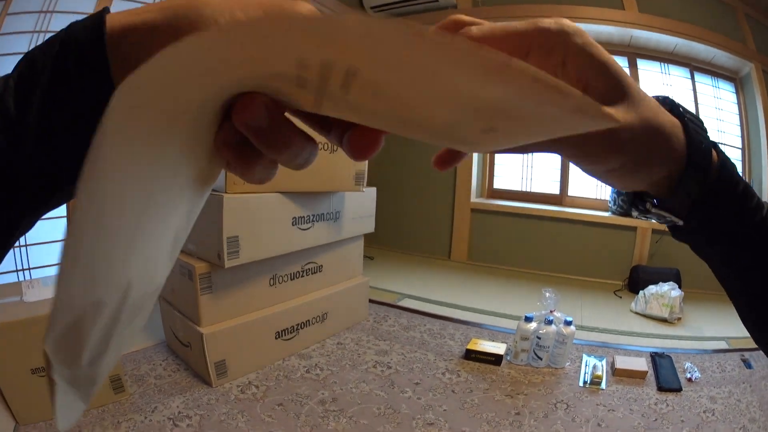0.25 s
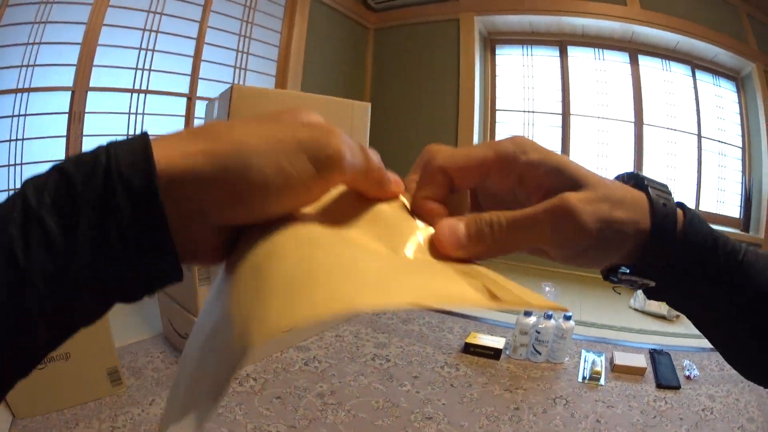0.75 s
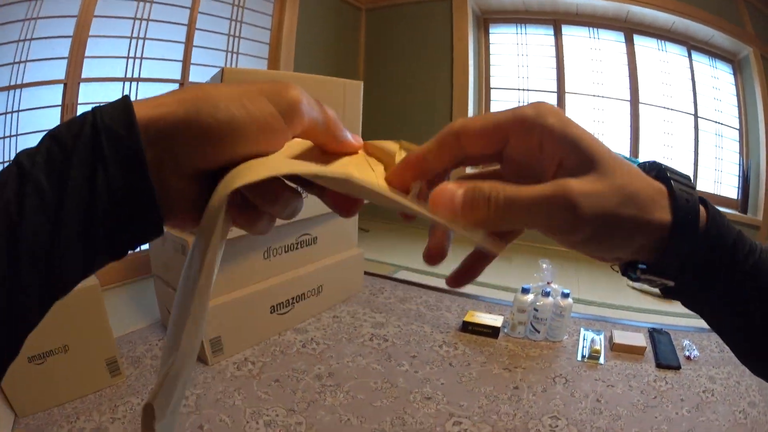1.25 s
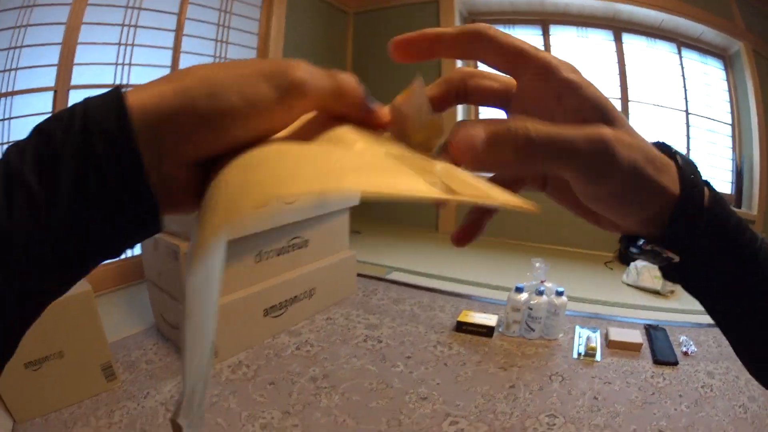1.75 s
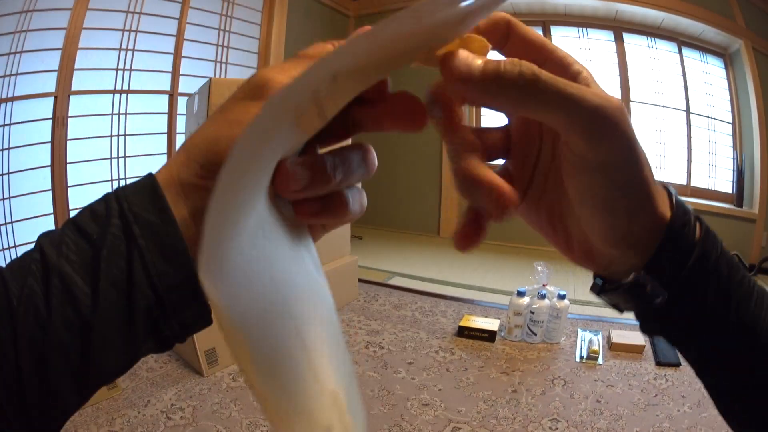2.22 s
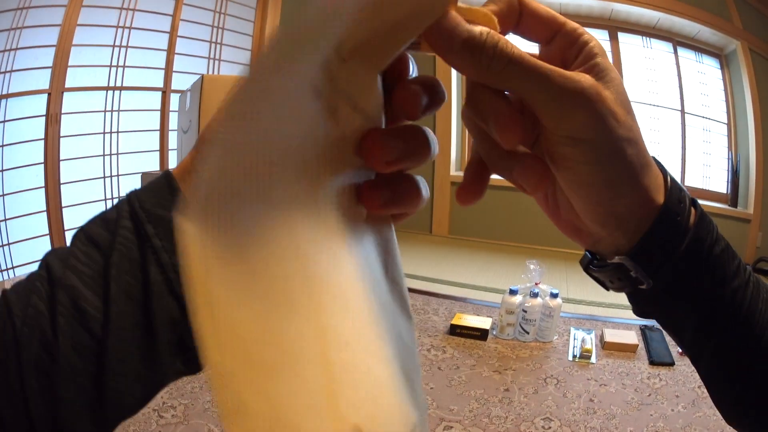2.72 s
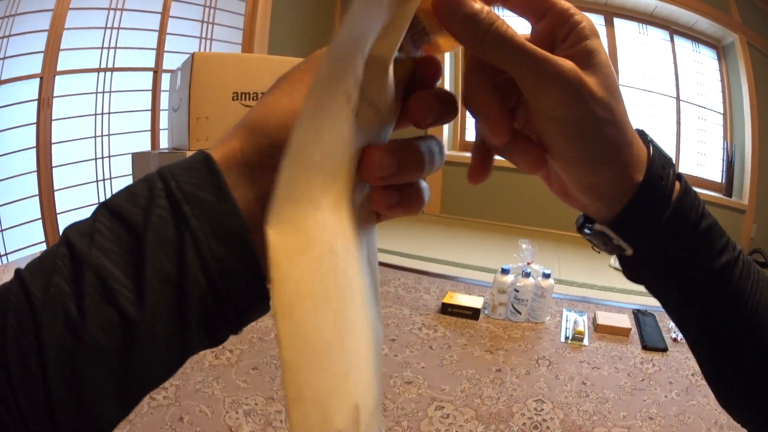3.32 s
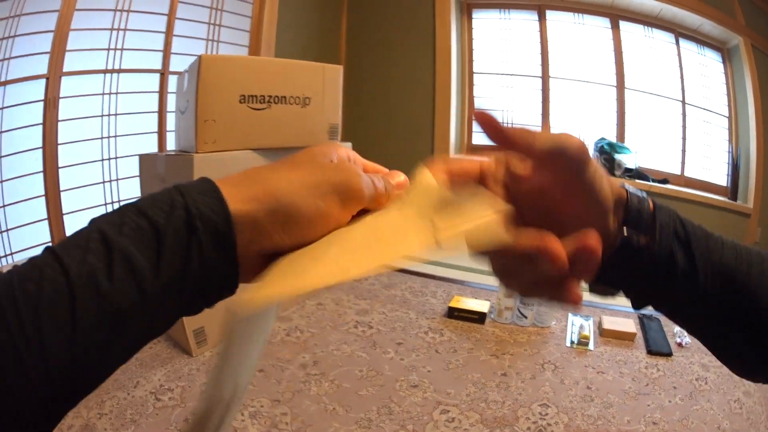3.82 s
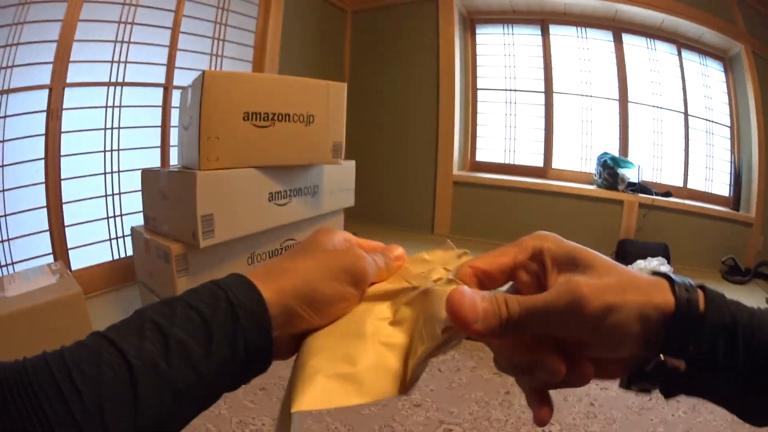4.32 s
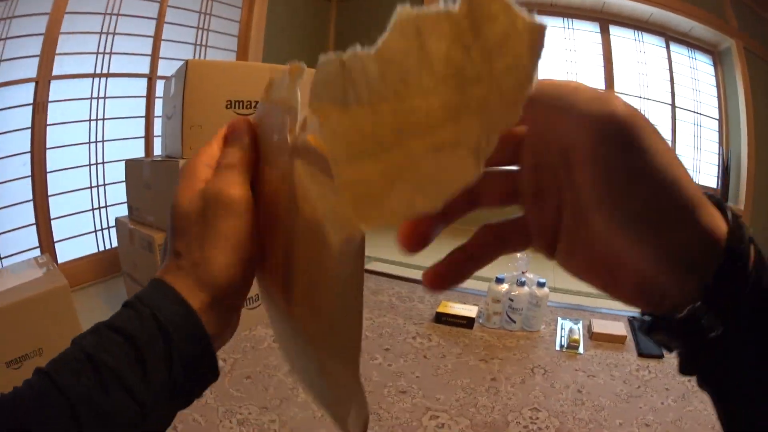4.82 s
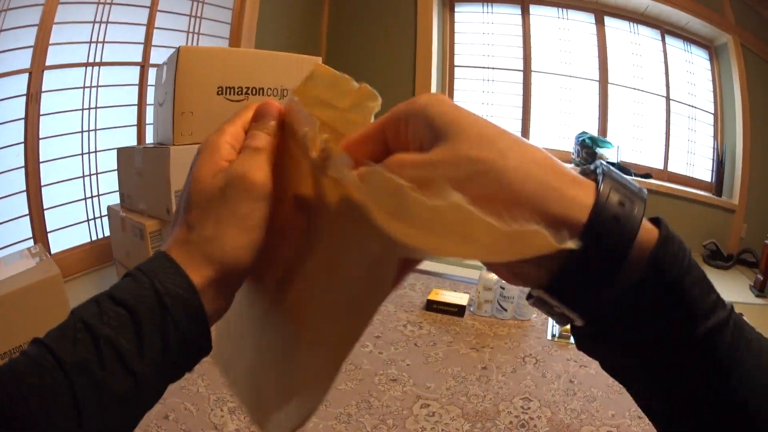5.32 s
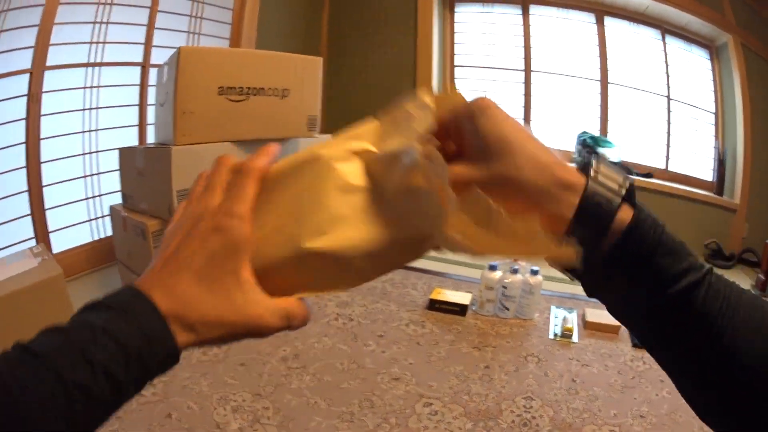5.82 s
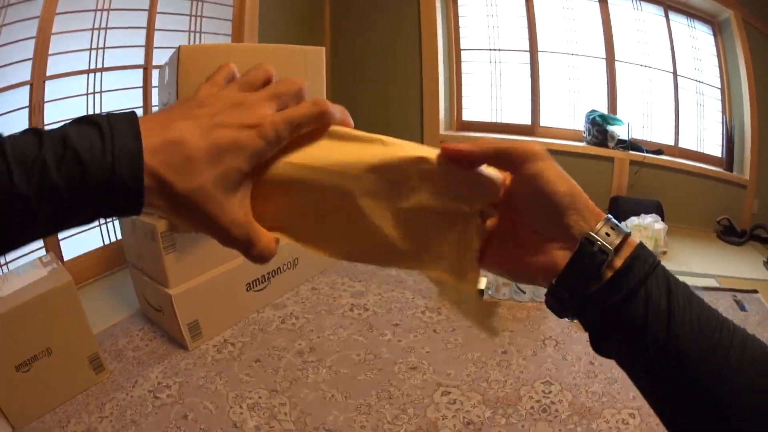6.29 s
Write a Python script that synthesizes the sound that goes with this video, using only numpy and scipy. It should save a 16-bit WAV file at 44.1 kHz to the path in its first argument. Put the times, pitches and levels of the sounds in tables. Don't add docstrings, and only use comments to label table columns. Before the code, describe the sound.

Stiff paper crackles in quick bright snaps, quiets to faint rustling, then rips sharply and crumples loudly as the bag is spread and handled close by.

```python
import sys
import numpy as np
from scipy import signal
from scipy.fft import rfft, irfft, next_fast_len
from scipy.io import wavfile
from scipy.ndimage import uniform_filter1d

SR = 44100
rng = np.random.default_rng(int(sys.argv[2]) if len(sys.argv) > 2 else 0)


def undo_db(level):
    steps = np.asarray(level, float) / 20
    return 10 ** steps


def persist_wave(psi):
    counts = np.round(np.clip(psi, -1, 1) * 32767).astype(np.int16)
    wavfile.write(sys.argv[1], SR, np.atleast_2d(counts).T)


N = 288855

# (frequency [Hz], density [dB per Hz])
AIR_SPECTRUM = [(24, -42), (40, -34), (429, -6.5), (720, 3), (1720, -17), (7210, -55), (11000, -22),
                (12000, -55), (22000, -120)]
AIR_DB = -63
# (frequency [Hz], T60 [s])
ROOM_DECAY = [(200, 0.27), (1500, 0.61), (5000, 0.32), (10000, 0.17)]
# (frequency [Hz], difference [dB])
PORT_LEVEL = [(60, -1), (220, -4), (840, -2), (3130, 2), (10500, 0.5), (12000, -1)]
# (frequency [Hz], left lead [rad])
PORT_PHASE = [(0, -0.72), (1030, 0.6), (5940, 0.27), (11900, -0.77)]
EDGE_HZ = 11040

# (frequency [Hz], density [dB per Hz])
PAPER_SPECTRUM = [(24, -52), (40, -38.5), (149, -28.5), (302, -8), (556, -2.5), (737, -7.5), (1490, 0.5),
                  (1840, -6), (2950, -4), (7040, 0), (9550, -21), (11000, -14.5), (14300, -77),
                  (22000, -120)]
# (frequency [Hz], width [Hz], level [dB])
BAG_MODES = [(1620, 1050, -7), (3000, 330, -10)]
# (time [s], share [0-1])
BAG_OPENING = [
    (0, 0.033),
    (3.4, 0.46),
    (4.4, 0.18),
    (5.6, 0.32),
    (6.55, .9),
]

# (time [s], peak level [dB])
FLOPS = [(0.191, -44), (0.67, -46), (1.511, -47), (1.988, -59), (4.344, -44), (4.912, -42), (5.152, -44),
         (5.274, -42), (5.314, -42), (5.421, -39), (5.56, -45), (5.925, -43), (5.939, -41), (4.59, -48),
         (1.75, -50)]
# (time [s], peak level [dB], panel pitch [Hz])
PANEL_POPS = [(0.177, -34, 398), (0.186, -34, 264), (0.364, -36, 552), (0.495, -34, 519), (0.744, -40, 549),
              (1.467, -28, 549), (1.654, -28, 560), (1.819, -32, 509), (1.999, -19, 280), (2.016, -20, 589),
              (2.079, -36, 514), (2.148, -37, 334), (2.726, -35, 310), (2.816, -35, 380), (2.887, -38, 334),
              (3.218, -42, 517), (3.868, -31, 509), (3.938, -26, 598), (4.121, -24, 514), (4.374, -27, 517),
              (4.439, -22, 439), (4.479, -30, 320), (4.911, -31, 318), (5.066, -34, 369), (5.152, -35, 226),
              (5.179, -40, 361), (5.254, -33, 423), (5.276, -33, 336), (5.299, -38, 242), (5.315, -31, 205),
              (5.519, -35, 522), (5.557, -30, 458), (5.586, -27, 436), (5.604, -35, 439), (5.624, -38, 291),
              (5.682, -35, 474), (5.799, -28, 423), (5.931, -26, 291), (5.98, -25, 320), (6.009, -33, 320),
              (6.065, -29, 493), (6.194, -24, 460), (6.307, -28, 331), (6.347, -22, 363), (6.435, -22, 363),
              (6.471, -24, 433), (6.512, -24, 568)]
POP_RISE_S, POP_T60_S, POP_DB = .0015, .035, -1

# (time [s], peak level [dB], ring pitch [Hz])
EXTRA_CREASES = [(0.0462, -8, 4610), (0.0589, -12, 4390), (0.0705, -16, 4070), (0.1556, -34, 5040),
                 (0.4982, -20, 5710), (0.5612, -29, 4010), (0.6393, -36, 1180), (0.7152, -26, 6800),
                 (0.8829, -22, 7470), (1.1499, -25, 1610), (1.1677, -31, 4310), (1.3796, -21, 1790),
                 (1.4367, -10, 1400), (1.6182, -22, 4180), (1.7666, -28, 1120), (1.9558, -23, 7130),
                 (2.0172, -9, 7710), (2.0191, -11, 6440), (2.1268, -29, 5340), (2.2559, -31, 3400),
                 (2.2982, -26, 4220), (2.353, -31, 5770), (2.5846, -31, 1400), (2.6719, -35, 950),
                 (2.6969, -29, 2670), (2.7909, -33, 2260), (2.8279, -27, 2710), (2.8577, -27, 2330),
                 (2.9718, -33, 4740), (3.2047, -28, 4840), (3.2386, -27, 2730), (3.2697, -31, 4820),
                 (3.3103, -30, 2710), (3.3519, -31, 3270), (3.4905, -20, 3100), (3.6855, -25, 3040),
                 (3.8289, -15, 4240), (3.9783, -21, 4500), (4.1093, -12, 4480), (4.1392, -6, 2970),
                 (4.1965, -19, 4330), (4.2182, -22, 6830), (4.2933, -17, 4440), (4.3235, -24, 1490),
                 (4.3408, -12, 4590), (4.3609, -6, 3040), (4.9121, -25, 3140), (5.0202, -24, 1940),
                 (5.2759, -26, 3340), (5.3777, -18, 1400), (5.4178, -19, 3490), (5.6868, -23, 3530),
                 (5.7803, -9, 3450), (5.8025, -7, 1270), (6.0079, -16, 7130), (6.0902, -26, 1440),
                 (6.1259, -31, 1510), (6.3313, -8, 1490), (6.5122, -12, 1490), (6.5312, -15, 3320)]
# (time [s], peak level [dB],
# ring pitch [Hz])
DRY_CREASES = [(0.2174, -21, 6600), (0.2455, -9, 7150), (0.2997, -2, 5050), (0.3652, -13, 2740),
               (0.5947, -21.5, 2500), (0.7457, -13, 3000), (0.768, -15, 6900), (0.8335, -21, 4700),
               (0.8934, -6, 4150), (0.908, -2.5, 3960), (0.9944, -17, 4600), (1.0895, -14, 4320),
               (1.3175, -11.5, 4900), (1.3255, -18, 6400), (1.4377, -6, 1480), (1.4533, -4, 4000),
               (1.5022, -10, 7300), (1.6435, -9, 7700), (1.6508, -2.5, 3830), (1.7104, -8, 1500),
               (1.851, -21, 2150), (1.865, -23, 4260), (1.9383, -3.5, 5140), (1.9989, -9, 7350),
               (2.0063, -8, 2420), (2.0914, -13.5, 2610), (2.178, -19, 3100), (2.2091, -12, 2950),
               (2.384, -15, 2680), (2.4592, -31, 4180),
               (2.9278, -20.5, 3080), (3.0708, -21, 1140), (3.083, -19, 1660), (3.1792, -27.5, 2560),
                   (3.2852, -24.5, 1870), (3.365, -18.5, 2880), (3.5961, -17, 4970), (3.646, -27, 1770),
                   (3.8145, -7, 1690), (3.868, -13, 1500), (3.8778, -3, 3670), (3.8882, -1.5, 1490),
                   (3.9405, -4, 2300), (4.025, -12, 7050), (4.049, -3.5, 1770), (4.137, -11, 5000),
                   (4.145, -4, 2700), (4.1903, -16, 1720), (4.2687, -6, 7060), (4.2768, -8, 4600),
                   (4.2807, -8, 7000), (4.3302, -8.5, 4650), (4.3476, -1, 5000), (4.38, -2, 4050),
                   (4.392, 2, 7650), (4.4085, -3, 3950), (4.4286, -3.5, 1620), (4.455, -14, 1530),
                   (4.772, -7.5, 4350), (4.813, -19, 2300),
               (4.9755, -22, 4650), (5.0443, -10, 2020), (5.07, -10, 2560), (5.1548, -14, 3160),
                   (5.236, -19.5, 2620), (5.432, -3, 2450), (5.44, -13, 3570), (5.4476, -18, 2300),
                   (5.5196, -12, 4100), (5.589, -9, 2070), (5.6166, -9, 1650), (5.723, -9, 1710),
                   (5.735, -8.5, 3860), (5.7673, -5, 2400), (5.772, -4, 1380), (5.7941, -5.5, 3280),
                   (5.8205, -9, 4350), (6.0154, -8, 3570), (6.0678, -12.5, 2450), (6.1886, -15, 1470),
                   (6.1948, -12.5, 3000), (6.244, -1.5, 5170), (6.3008, -8, 1800), (6.3104, -3.5, 2340),
                   (6.3165, -1, 3140), (6.3474, -7, 1540), (6.372, -9, 1330), (6.4275, -6, 1280),
                   (6.4555, -2.5, 2800), (6.5174, -3.5, 4670),
               (2.6138, -21.5, 1600), (2.5716, -30, 2400), (0.3369, -18, 5080), (1.632, -13, 7680),
                (0.391, -21, 7000), (1.8206, -19.5, 5000), (2.1695, -18, 2900), (2.897, -23, 2600),
                (3.6583, -24, 2000), (4.44, -5, 1450), (5.3104, -17.5, 1900), (6.3245, -3, 3100)]
# (time [s], peak level [dB], ring pitch [Hz], thump relative level [dB])
PANEL_BUCKLES = [(0.1719, -7.5, 4370, -22), (0.6667, -10, 3320, -16), (1.0673, -3, 3040, -18),
                 (1.1047, -20.5, 2930, -17), (1.5148, -20, 1510, -11), (1.6111, -22, 3020, -16),
                 (1.7924, -41, 1200, -10), (1.9761, -11.5, 2190, -9.5), (2.0024, -6, 2420, -14),
                 (2.738, -26, 2560, -9), (2.9442, -19.5, 7000, -12.5), (3.321, -28, 1331, -10),
                 (3.4988, -12, 1070, -19.5), (3.5537, -14.5, 1100, -12), (3.7977, -23, 4440, -14),
                 (3.9885, -15, 1580, -4), (4.122, -5, 4480, -21), (4.3519, -7, 1400, -7.5),
                 (4.4136, -2, 3830, -11.5), (4.7048, -21, 1720, -20), (4.9369, -17.5, 2700, -7.5),
                 (5.008, -10, 2000, -17), (5.3667, -10.5, 5530, -10), (5.3845, -12.5, 1320, -8),
                 (5.424, -4.5, 1570, -14), (5.5052, -12, 2400, -12.5), (5.7437, -9.5, 1780, -12),
                 (5.9938, -11.5, 1540, -12), (6.219, -17.5, 1490, -6), (6.4834, -8, 1660, -19)]
# (start [s], length [s], peak level [dB], ring pitch [Hz])
FOLD_RUNS = [
    (0.003, 0.08, -7.5, 4400),
    (1.616, 0.025, -23, 1520),
    (4.341, 0.055, -7.5, 4030),
    (5.336, 0.05, -21.5, 1330),
    (5.572, 0.006, -9, 1310),
    (5.785, 0.03, -20, 1990),
    (6.331, 0.04, -9, 1470),
    (6.434, 0.014, -6.5, 2030),
    (6.507, 0.03, -20, 2140),
]
RUN_GAP_S, RUN_FADE_DB_PER_S = .011, 70
RUN_SPREAD_DB, RUN_SPREAD_LOG_PITCH = 1.5, 0.098
SNAP_LEAD_S, EXTRA_LATE_S = .002, -.0004
DRY_THUMP_DB, DRY_SPREAD_DB = -31, 3.5

# (time [s], level [dB])
HAND_GRIP = [(0, -49), (0.55, -49.5), (0.82, -49), (1.12, -44), (1.3, -46.5), (1.75, -46), (1.9, -56),
             (1.96, -44), (2.27, -49), (2.47, -58), (3.0, -62), (3.4, -54.5), (4.06, -40.5), (4.3, -40),
             (4.85, -60), (5.2, -46), (6.1, -45.5), (6.55, -53)]
GRIP_FIZZ_DB, GRIP_FLEX_DB, GRIP_FLEX_SHARE = -3, -51.5, 0.2
# (start [s], length [s], effort [dB], fizz relative level [dB])
SEAM_PULLS = [(0.873, 0.047, -32, 5), (0.917, 0.067, -38, -7), (0.986, 0.034, -36, 11),
              (1.02, 0.09, -38.5, -2.5), (1.167, 0.11, -51, 12), (1.38, 0.036, -41, -1),
              (1.424, 0.018, -25, 2.5), (1.455, 0.066, -31, 2.3), (1.61, 0.025, -41, 1),
              (1.998, 0.024, -27, 3.5), (2.098, 0.2, -44.5, -12), (2.572, 0.045, -42.5, -3.5),
              (3.063, 0.073, -45, -4), (3.308, 0.026, -37, -3.5), (3.415, 0.073, -49.5, 0.5),
              (3.483, 0.081, -32, -3.5), (3.561, 0.23, -41.5, -4), (3.814, 0.137, -32, 4),
              (3.951, 0.098, -36, -3), (4.107, 0.045, -27, 3), (4.152, 0.07, -37, 1.5),
              (4.217, 0.052, -51, -1), (4.263, 0.035, -33, 2), (4.328, 0.019, -37, 10),
              (4.345, 0.105, -27.5, -0.5), (4.347, 0.01, -27, -2), (4.372, 0.024, -30, 5),
              (4.406, 0.011, -27, 1), (4.437, 0.013, -26, -1), (3.936, 0.01, -27, -1),
              (4.117, 0.014, -31, 3), (1.428, 0.012, -33, -8), (4.455, 0.04, -26, 0), (4.5, 0.05, -35, -1),
              (4.55, 0.05, -43, -7), (5.364, 0.095, -32.5, -4.5), (5.504, 0.1, -39, -3),
              (5.624, 0.1, -50.5, -12), (5.735, 0.09, -24, -8.5), (5.826, 0.11, -36.5, -4.5),
              (6.31, 0.074, -25.5, -8.5)]
# (start [s], length [s], effort [dB], fizz relative level [dB])
SHEET_BENDS = [(0.0, 0.067, -45.5, 17.5), (0.172, 0.017, -50, 13), (0.186, 0.093, -49, 6),
               (0.343, 0.038, -48, 13), (0.487, 0.055, -46, 9.5), (0.662, 0.12, -47, 9.5),
               (1.641, 0.033, -34, -16), (1.785, 0.053, -36, -1.5), (1.998, 0.006, -40, 3.5),
               (2.026, 0.077, -42, -2), (2.291, 0.12, -48.5, 0.5), (2.691, 0.129, -47, -2.5),
               (2.815, 0.025, -46.5, 3), (2.854, 0.045, -44, 2.5), (2.51, 0.046, -58.5, 4),
               (5.67, 0.035, -43, 2), (2.897, 0.061, -45.5, -15), (3.201, 0.13, -46.5, 2),
               (3.72, 0.09, -58, 8), (4.488, 0.041, -38, -2), (4.911, 0.228, -44, 1.5),
               (5.148, 0.04, -41, 5.5), (5.272, 0.1, -41.5, 4.1), (5.923, 0.1, -33.5, 1.5),
               (6.026, 0.058, -37.5, 1.5), (6.186, 0.15, -39.5, -5), (6.385, 0.038, -33, 2),
               (6.425, 0.1055, -29, -4)]
PULL_FLEX_DB, BEND_FLEX_DB = -12, -3
PULL_SAG_DB, BEND_SAG_DB = 1.5, -3
SPRING_BACK_S = 0.1
SPRING_BACK_GAIN = [
    [0.38],
    [0.26],
    [0.38],
]


def evened(x):
    return x / np.sqrt(np.mean(x ** 2) + 1e-20)


def read(points, hz):
    f, value = np.transpose(points)
    return np.interp(np.log(hz + 1), np.log(f + 1), value)


def add(mix, start_s, sound):
    part = mix[..., round(start_s * SR):][..., :sound.shape[-1]]
    part += sound[..., :part.shape[-1]]


def ring(x, hz, width_hz):
    centre_hz = np.clip(hz, 50, SR / 2.2)
    b, a = signal.iirpeak(centre_hz, max(hz / width_hz, .3), SR)
    return signal.lfilter(b, a, x)


def coloured(x, points):
    hz = abs(np.fft.fftfreq(4096, 1 / SR))
    log_gain = np.log(undo_db(np.maximum(read(points, hz), -90)))
    taps = np.fft.ifft(np.exp(np.conj(signal.hilbert(log_gain)))).real[:2048]
    return signal.oaconvolve(x, taps[None])[:, :N]


def air():
    a, b = rng.standard_normal((2, N))
    return undo_db(AIR_DB) * evened(coloured(np.array([a, .5 * a + 1.5 * b]), AIR_SPECTRUM))


def room(x):
    taps = np.zeros((2, SR))
    at = np.arange(120, SR - 20, 20) + rng.integers(0, 20, (2, (SR - 121) // 20))
    np.put_along_axis(taps, at, rng.choice([-1., 1.], at.shape), 1)
    taps[1] = 0.69 * taps[0] + 0.68 * taps[1]
    hz, t, z = signal.stft(taps, SR, nperseg=256)
    decay = undo_db(-60 * t / read(ROOM_DECAY, hz)[:, None])
    tail = signal.istft(z * decay, SR, nperseg=256)[1]
    return signal.fftconvolve(x.mean(0)[None], tail / np.linalg.norm(tail[0]), axes=1)[:, :N]


def bag_hollow(paper):
    hollow = sum(undo_db(db) * ring(paper, hz, width_hz) for hz, width_hz, db in BAG_MODES)
    return 2 * np.interp(np.arange(N) / SR, *np.transpose(BAG_OPENING)) * hollow


def thuds():
    out = np.zeros((2, N))
    t = np.arange(2000) / SR
    swing = np.sin(2 * np.pi * 110 * t) * np.exp(-t / 0.0074)
    for (start_s, db), lean in zip(FLOPS, rng.uniform(-0.61, 0.46, len(FLOPS))):
        sides = 1 + lean * np.array([[1], [-1]])
        add(out, start_s, undo_db(db + 16.5) * sides * swing)
    return out


def pops():
    out = np.zeros((2, N))
    t = np.arange(3000) / SR
    shape = (1 - np.exp(-t / POP_RISE_S)) * undo_db(-60 * t / POP_T60_S)
    shape = shape / shape.max()
    for (start_s, db, hz), (lean, over) in zip(PANEL_POPS, rng.uniform(-1, 1, (60, 2))):
        over_hz = hz * (1.6 + .2 * over)
        swing = np.sin(2 * np.pi * hz * t) + .4 * np.sin(2 * np.pi * over_hz * t)
        sides = 1 + .3 * lean * np.array([[1], [-1]])
        add(out, start_s, undo_db(db + POP_DB) * sides * swing * shape)
    return out


def snap(db, hz, thump_db, chance):
    t = np.arange(len(chance)) / SR - SNAP_LEAD_S
    t60_s = np.where(t < 0, .006, 0.0096 * np.exp(0.35 * chance[4, 1]))
    breaks = 0.47 * chance[:, 0] * (chance[:, 1] > .66) * undo_db(-60 * abs(t) / t60_s)
    breaks[round(SNAP_LEAD_S * SR)] = 1.46 * np.sign(chance[0, 0])

    other_hz = hz * np.exp(0.29 + 0.45 * chance[1, 0])
    main = ring(breaks, hz, .28 * hz)
    other = .4 * ring(breaks, other_hz, 0.83 * hz)
    edge = 0.15 * np.sqrt(hz / 4000 + 0.28) * (breaks - uniform_filter1d(breaks, size=40))
    crack = main + other + edge

    panel_hz = 380 * np.exp(0.306 * chance[2, 0])
    after = np.maximum(t, 0)
    push = np.sin(2 * np.pi * panel_hz * after) * undo_db(-60 * after / 0.014)
    push = push * (1 - np.exp(-after / 0.00013))
    pan = undo_db(1.3 * chance[3, 0] * np.array([[.5], [-.5]]))
    return undo_db(db + 2.0) * pan * (crack / abs(crack).max() + undo_db(thump_db + 1.5) * push)


def extra_creases():
    out = np.zeros((2, N))
    for (start_s, db, hz), chance in zip(EXTRA_CREASES, rng.standard_normal((60, 1000, 2))):
        add(out, start_s + EXTRA_LATE_S - SNAP_LEAD_S, snap(db, hz, DRY_THUMP_DB, chance))
    return out


def runs():
    rows = []
    for (start, length, db, hz), chance in zip(FOLD_RUNS, rng.standard_normal((len(FOLD_RUNS), 3, 12))):
        steps = np.arange(12) * RUN_GAP_S
        late, loud, pitch = chance[:, steps < length]
        times = start + steps[steps < length] + RUN_GAP_S / 4 * abs(late)
        levels_db = db + RUN_SPREAD_DB * loud.clip(-2, 1) - RUN_FADE_DB_PER_S * (times - start)
        rows += zip(times, levels_db, hz * np.exp(RUN_SPREAD_LOG_PITCH * pitch))
    return rows


def snaps():
    out = np.zeros((2, N))
    dry_creases = DRY_CREASES + runs()
    thumps_db = DRY_THUMP_DB + DRY_SPREAD_DB * rng.standard_normal(200).clip(-2, 1)
    creases = PANEL_BUCKLES + [(*row, db) for row, db in zip(dry_creases, thumps_db)]
    for (start_s, *row), chance in zip(creases, rng.standard_normal((200, 1000, 2))):
        add(out, start_s - SNAP_LEAD_S, snap(*row, chance))
    return out


def clumps(fall_ms, depth_db):
    steps, rate = N // 16 + 2, SR / 16
    jolts = rng.exponential(1, steps) * (rng.random(steps) < 1000 / fall_ms / rate)
    fall = np.exp(-1000 / (fall_ms * rate))
    swell = uniform_filter1d(signal.lfilter([1], [1, -fall], jolts), size=6)
    gain = evened(undo_db(depth_db * np.minimum(swell, 3.6)))
    return np.interp(np.arange(N) / SR, np.arange(steps) / rate, gain)


def grains(lo_hz, hi_hz, per_s, cycles, spread_db, clump_ms, clump_db, wide, count=10):
    out = np.zeros((2, N))
    for hz in np.geomspace(lo_hz, hi_hz, count):
        t = np.arange(min(1200, round(8 * cycles * SR / hz))) / SR
        wavelet = np.sin(2 * np.pi * hz * t) * np.exp(-t * hz / cycles)
        wavelet = evened(wavelet)[None] * np.sqrt(hz / len(t))
        place, big, sign, lean = rng.random((round(per_s / count * N / SR), 4)).T
        size = undo_db(spread_db * np.minimum(-np.log(big + 1e-9), 4)) * np.sign(sign - .5)
        sides = 1 + wide * (2.8 * lean - 1.56) * [[1], [-1]]
        hits = np.zeros((2, N))
        hits[:, (place * N).astype(int)] = size * sides
        out += signal.oaconvolve(hits * clumps(clump_ms, clump_db), wavelet)[:, :N]
    return evened(out * clumps(2 * clump_ms, clump_db))


def hand_moves():
    moves = np.zeros((3, N))
    kinds = ((SEAM_PULLS, PULL_FLEX_DB, PULL_SAG_DB), (SHEET_BENDS, BEND_FLEX_DB, BEND_SAG_DB))
    for rows, flex_db, sag_db in kinds:
        for start_s, length_s, effort_db, fizz_db in rows:
            slope_db = sag_db * np.linspace(-.5, .5, round(length_s * SR))
            add(moves, start_s, undo_db(effort_db + np.array([[0], [fizz_db], [flex_db]]) + slope_db))
    return uniform_filter1d(moves, size=300) * clumps(fall_ms=4, depth_db=2.0)


def handling():
    grip_db = np.interp(np.arange(N) / SR, *np.transpose(HAND_GRIP))
    grip_flex_db = GRIP_FLEX_DB + GRIP_FLEX_SHARE * (grip_db - GRIP_FLEX_DB)
    rest = undo_db(np.array([grip_db, grip_db + GRIP_FIZZ_DB, grip_flex_db]))
    moves = hand_moves()
    held = np.maximum(rest, moves)
    spring = np.exp(-1 / (SPRING_BACK_S * SR))
    held = np.maximum(held, SPRING_BACK_GAIN * signal.lfilter([1 - spring], [1, -spring], moves))
    settle = np.exp(-1 / (0.0061 * SR))
    settling = 0.53 * signal.lfilter([1 - settle], [1, -settle], held)
    tear, fizz, flex = np.maximum(held, settling)
    out = tear * grains(859, 4340, per_s=1800, cycles=2.9, spread_db=2.4,
                        clump_ms=6, clump_db=2.0, wide=0.24)
    out = out + fizz * grains(4150, 10700, per_s=5400, cycles=1.4, spread_db=2.0,
                              clump_ms=5, clump_db=1.0, wide=0.24)
    return out + flex * grains(149.0, 626, per_s=900, cycles=0.97, spread_db=2.0,
                               clump_ms=12, clump_db=1.3, wide=0.15)


def scene():
    paper = handling() + snaps() + thuds() + extra_creases() + pops()
    paper = paper + bag_hollow(paper)
    paper = undo_db(4.0) * coloured(paper, [(hz, .5 * db) for hz, db in PAPER_SPECTRUM])
    return paper + undo_db(-16.5) * room(paper) + air()


def low_pass(x):
    return signal.sosfilt(signal.butter(12, 12310, fs=SR, output="sos"), x)


def record(dry):
    size = next_fast_len(N)
    hz = np.fft.rfftfreq(size, 1 / SR)
    half = undo_db(read(PORT_LEVEL, hz) / 2) * np.exp(.5j * read(PORT_PHASE, hz))
    low_cut = hz / np.hypot(hz, 70)
    edge = np.where(hz < EDGE_HZ, 1, 0.26 * (EDGE_HZ / (hz + 1)) ** 22) * low_cut
    overloaded = 0.99 * np.tanh(dry / 1.071)
    ports = irfft(rfft(overloaded, size) * np.array([half, 1 / half]) * edge, size)[:, :N]
    ports = 0.8 * ports / (1 + (abs(ports) / 0.95) ** 8) ** .125
    return low_pass(ports)


dry = scene()
out = record(dry)
persist_wave(out)
```